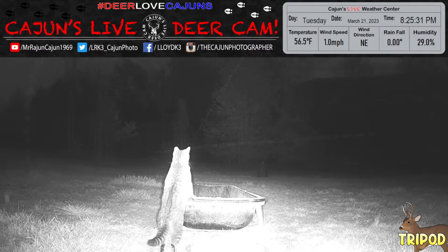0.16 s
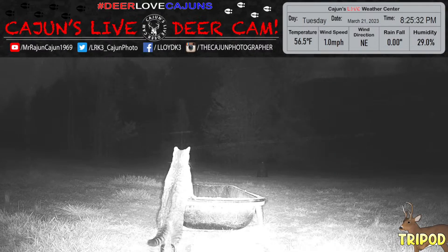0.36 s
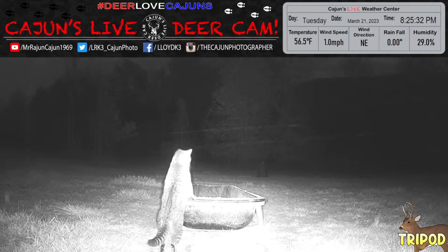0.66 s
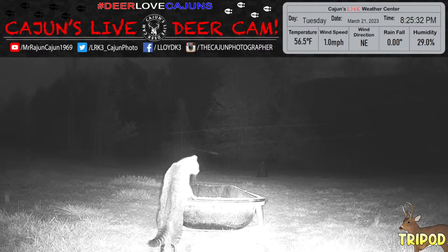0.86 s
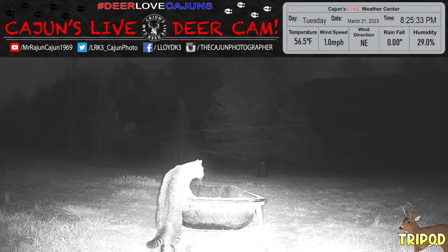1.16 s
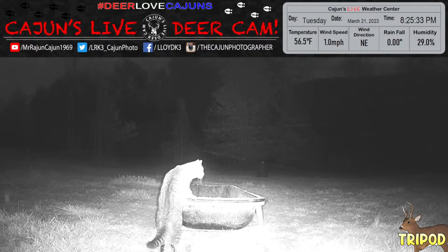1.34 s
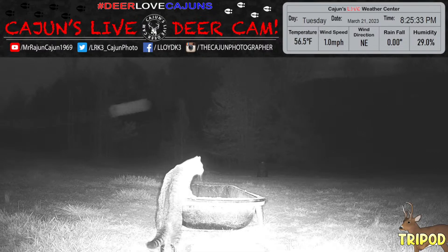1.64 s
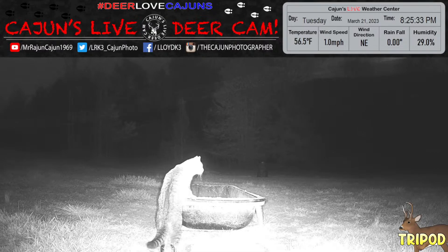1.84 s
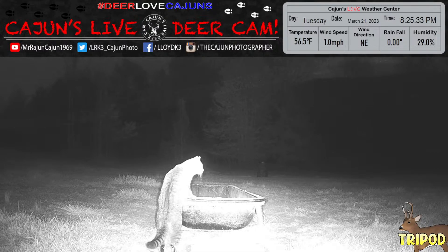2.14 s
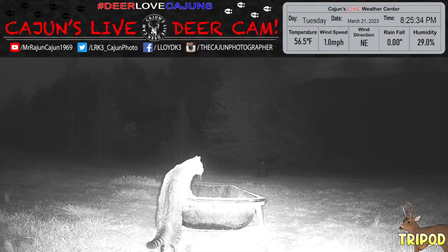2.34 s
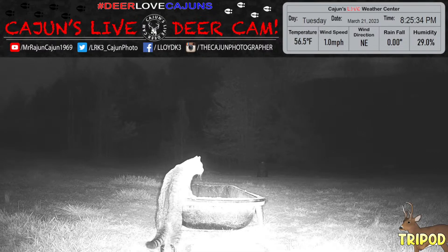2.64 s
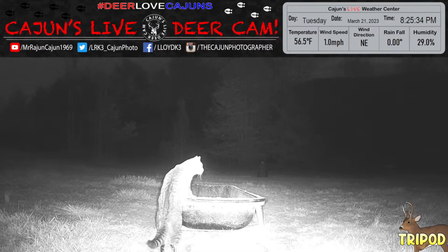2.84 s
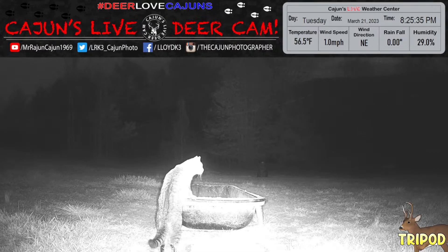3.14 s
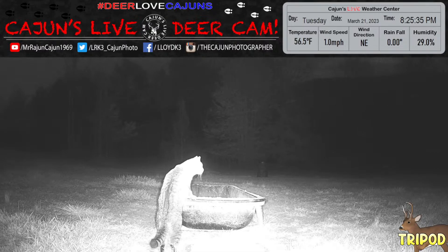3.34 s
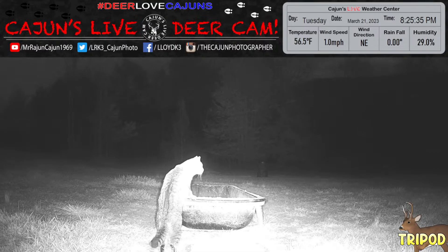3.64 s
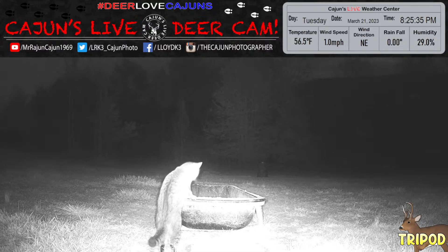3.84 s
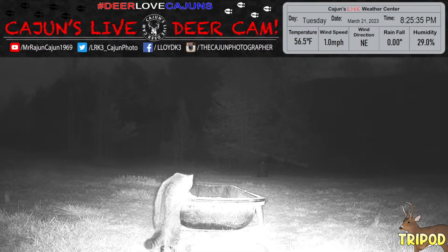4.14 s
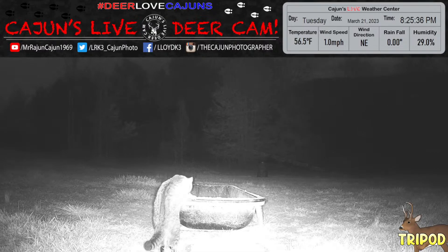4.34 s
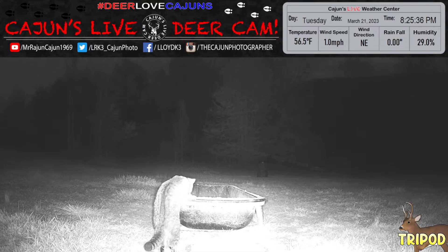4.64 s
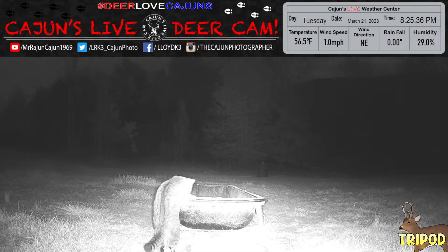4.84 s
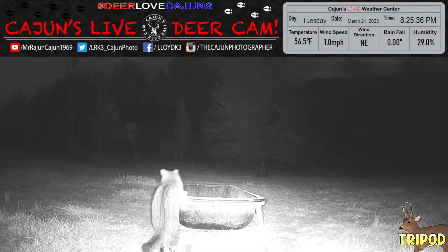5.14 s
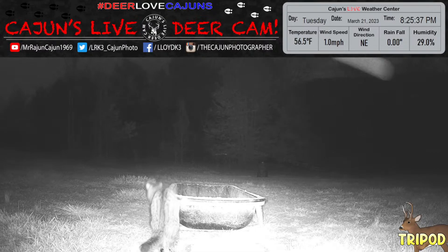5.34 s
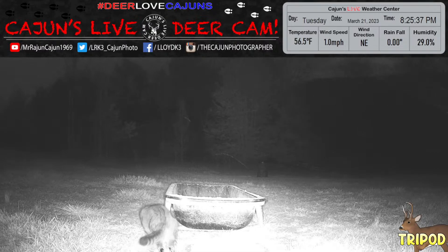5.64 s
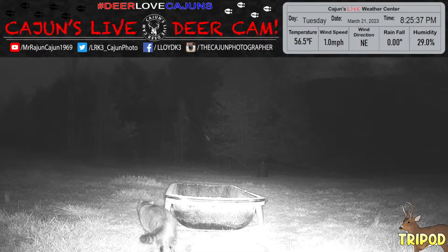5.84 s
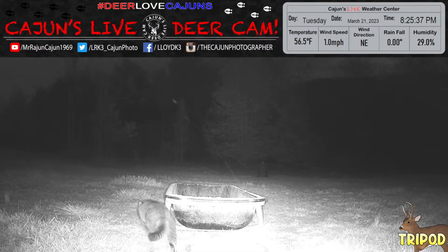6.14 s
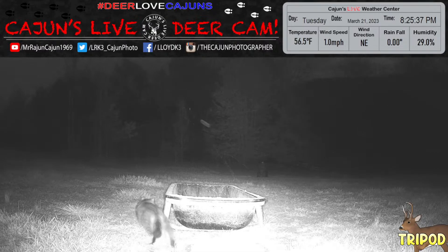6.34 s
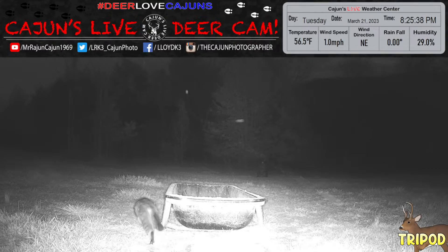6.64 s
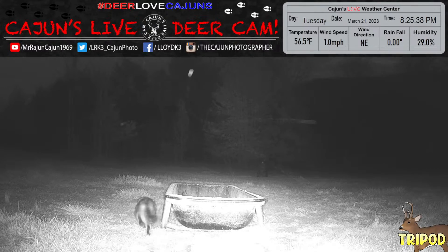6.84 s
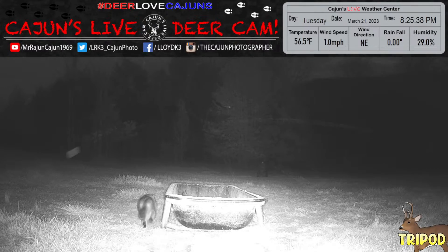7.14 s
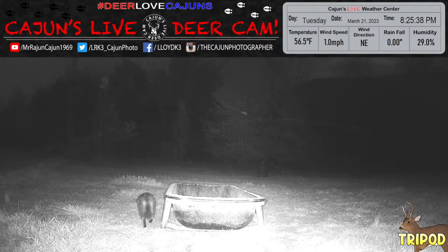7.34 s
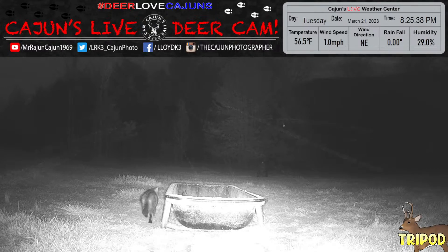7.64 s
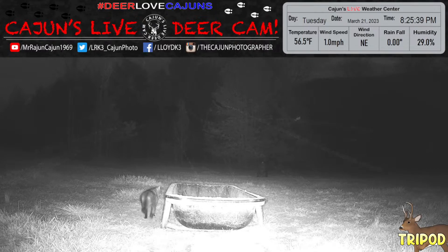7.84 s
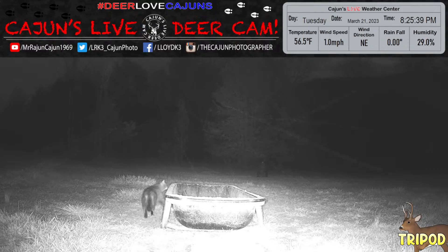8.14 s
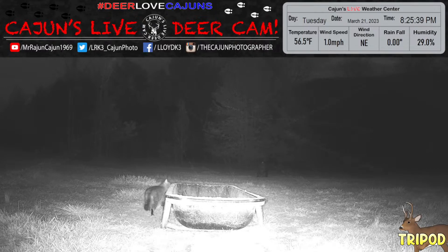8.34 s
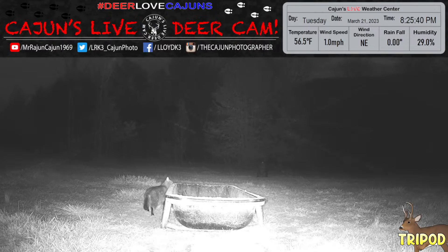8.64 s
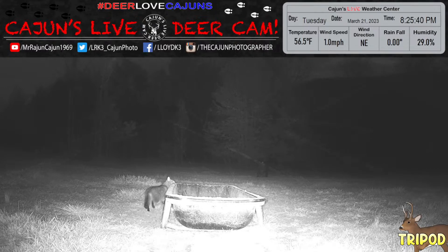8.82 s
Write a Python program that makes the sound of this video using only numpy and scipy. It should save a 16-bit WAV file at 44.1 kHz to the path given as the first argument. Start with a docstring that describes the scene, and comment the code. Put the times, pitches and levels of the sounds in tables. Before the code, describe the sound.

A dense chorus of high, rising frog peeps fills an open field at night, echoing slightly off the trees. One cricket pulses in a fast trill over fainter ones, and far-off traffic makes a low, steady hum. Midway there is a quick, light knocking of paws on a trough, followed by a small snap. Faint microphone hiss lies under everything.

```python
"""Tree frogs whistle rising peeps from their vocal sacs in a night meadow: near ones clear, a far crowd
blurred by the wood. One cricket trills with its wings over fainter ones. Behind them a distant engine
drones over tyre roar. A cat's paws ring a trough, small things snap, and the microphone hisses."""
import sys
import numpy as np
from scipy import signal
from scipy.fft import rfft, irfft
from scipy.io import wavfile
from scipy.ndimage import map_coordinates

SR = 44100
rng = np.random.default_rng(int(sys.argv[2]) if len(sys.argv) > 2 else 0)


def store_pcm(level_fs):
    """Save levels as 16-bit WAV."""
    pcm = np.round(np.clip(level_fs, -1, 1) * 32767).astype(np.int16)
    wavfile.write(sys.argv[1], SR, np.atleast_2d(pcm).T)


N = 396018


def amp(db):
    """Gain of a level in dB."""
    return 10 ** (np.asarray(db) / 20)


def unit(x):
    """Scaled to rms 1."""
    return x / np.sqrt(np.mean(x ** 2) + 1e-20)


def wobble(rate_hz):
    """Smooth random curve, rate_hz knots a second."""
    knots = rng.standard_normal(int(N * rate_hz / SR) + 4)
    return map_coordinates(knots, [np.arange(N) * rate_hz / SR])


def noise(spectrum):
    """Noise of rms 1, coloured by (frequency [Hz], level [dB]) points."""
    hz, db = np.transpose(spectrum)
    grid_hz = np.fft.rfftfreq(N, 1 / SR)
    gain = amp(np.interp(np.log(grid_hz + 1), np.log(hz + 1), db))
    return unit(irfft(rfft(rng.standard_normal(N)) * gain, N))


def add(track, time_s, sound):
    """Mixes a sound into a track."""
    part = track[max(round(time_s * SR), 0):][:len(sound)]
    part += sound[:len(part)]


def glide(length_s, start_hz, end_hz, bend, attack_s, release_s):
    """Progress (0-1), frequency, phase and envelope of a note whose pitch moves fastest at first."""
    t = np.arange(round(length_s * SR)) / SR
    progress = t / length_s
    hz = start_hz + (end_hz - start_hz) * (progress + bend * progress * (1 - progress))
    phase = 2 * np.pi * (np.cumsum(hz) / SR + rng.random())
    edge = np.clip(np.minimum(t / attack_s, (length_s - t) / release_s), 0, 1)
    return progress, hz, phase, np.sin(np.pi / 2 * edge) ** 2


def wood_echo(x, t60_s, gap_s):
    """Trees scatter the sound into a decaying tail after a gap."""
    t = np.arange(SR) / SR
    tail = rng.standard_normal(SR) * amp(-60 * t / t60_s) * (t > gap_s)
    return signal.fftconvolve(x, tail / np.linalg.norm(tail))[:N]


# Tyre roar level: (time [s], relative level [dB])
ROAD_LEVEL = [(0, -45), (3.6, -44.5), (6.2, -44.5), (6.75, -44.5), (8.05, -44), (8.98, -44.5)]
# Tyre roar spectrum: (frequency [Hz], relative density [dB])
ROAD_SPECTRUM = [(12, -27), (25, -13.5), (38, -24), (70, -4), (135, -4.5), (170, -10.5), (240, -14),
                 (420, -17.5), (540, -22), (700, -28.5), (900, -28.5), (1250, -34), (1650, -41),
                 (2300, -42), (3000, -33.5), (5000, -120)]


def road():
    """Tyres make a dull, nearly steady roar."""
    level_db = np.interp(np.arange(N) / SR, *np.transpose(ROAD_LEVEL)) - 3 + 0.2 * wobble(3.045)
    return amp(level_db) * noise(ROAD_SPECTRUM)


# Engine run: (time [s], cycle rate [Hz], drone [dB], buzz [dB], whine [dB])
ENGINE_RUN = [(0, 19.8, -38.5, -53.5, -54.5), (0.349, 19.5, -44.5, -51, -54), (.8, 18.9, -43.5, -50, -60),
              (1.15, 18, -51, -50, -57.5), (1.4, 17.4, -50, -46.5, -54.5), (2.278, 17, -44.5, -48, -52),
              (2.9, 16.9, -45, -47.5, -55), (3.2, 16.2, -45, -54, -60), (3.7, 16.2, -54.5, -58, -61.5),
              (3.9, 17.4, -65, -50.5, -73), (4.4, 17.2, -58, -55, -65), (5.3, 16.8, -59.5, -57.5, -66),
              (5.6, 17.2, -51, -59.5, -68.5), (6.15, 16.9, -49.5, -66, -83), (6.45, 17.1, -57, -60, -64),
              (6.85, 17.2, -47, -58, -72), (7.6, 16.9, -50.5, -66, -70), (8.05, 16.8, -58.5, -63, -77),
              (8.3, 17.1, -45.5, -66, -80), (8.98, 17.2, -47, -54.5, -82)]
# Low, middle and top harmonics: (cycle multiple, relative level [dB])
DRONE_HARMONICS = [(5, -7), (6, -14), (7, -11), (8, 0)]
BUZZ_HARMONICS = [(9, -2), (10, -7), (11, -1), (12, -1), (13, -13)]
WHINE_HARMONICS = [(15, -5), (16, 0), (17, -3), (19, -11)]


def engine():
    """Harmonics of the engine cycle drift together in pitch and flutter one by one in the air."""
    out, t = np.zeros(N), np.arange(N) / SR
    times_s, cycle_hz, *bands_db = np.transpose(ENGINE_RUN)
    phase = 2 * np.pi * np.cumsum(np.interp(t, times_s, cycle_hz)) / SR
    for harmonics, band_db in zip((DRONE_HARMONICS, BUZZ_HARMONICS, WHINE_HARMONICS), bands_db):
        for k, db in harmonics:
            flutter_db = 1.5 * wobble(2) + 3 * wobble(11)
            gain = amp(np.interp(t, times_s, band_db) + db + 3 + flutter_db)
            out += gain * np.sin(k * phase + 2 * np.pi * rng.random() + 0.75 * wobble(10))
    return out


# Paws leaving the rim: (time [s], level [dB])
PAW_KNOCKS = [(4.972, -35), (5.002, -39), (5.038, -48)]
# Trough modes: (frequency [Hz], relative level [dB], t60 [s])
TROUGH_MODES = [(493, -6, 0.04), (774, -11, 0.027), (1880, -2.5, 0.027), (2220, 6.5, 0.013),
                (3500, -6, 0.016), (4550, -7, 0.01), (5350, -7, 0.01), (5900, -11, 0.011)]


def trough_knocks():
    """A cat's paws ring the trough's modes, in a different balance each knock."""
    out, t = np.zeros(N), np.arange(SR // 20) / SR
    attack = 1 - np.exp(-t / 0.00051)
    for time_s, db in PAW_KNOCKS:
        ring = sum(amp(mode_db + rng.normal(0, 2) - 60 * t / t60_s) * np.sin(2 * np.pi * hz * t)
                   for hz, mode_db, t60_s in TROUGH_MODES)
        add(out, time_s, amp(db) * attack * ring)
    return out


# Snaps in the grass and at the trough: (time [s], relative level [dB], low edge [Hz], high edge [Hz])
SNAP_BURSTS = [(1.0354, -50, 1910, 3300), (1.0356, -58, 4300, 5300), (1.0586, -46, 4150, 5160),
               (1.059, -49.5, 1900, 3000), (4.2545, -51, 1620, 2620), (4.2558, -60, 3800, 6500),
               (5.083, -53, 3495, 5470), (5.512, -41, 2940, 4950), (5.5122, -42, 6040, 9100),
               (7.6227, -53, 4200, 5800)]


def snaps(t60_s=0.013):
    """Each small snap is a few ms of band-limited noise."""
    out, t = np.zeros(N), np.arange(SR // 20) / SR
    envelope = amp(-60 * t / t60_s) * (1 - np.exp(-t / 0.00055))
    for time_s, db, low_hz, high_hz in SNAP_BURSTS:
        band = signal.butter(3, [low_hz, high_hz], "band", fs=SR, output="sos")
        burst = signal.sosfilt(band, rng.standard_normal(len(t)) * envelope)
        add(out, time_s, amp(db - 15.5) * unit(burst))
    return out


def wing_strokes(times_s, levels_db, start_hz, end_hz, spread_hz):
    """Each stroke rings a note that falls as the scraper slows; harder strokes start higher."""
    wing_hz, width_hz, resonance_db = 3830, 150, 4
    out, mean_db = np.zeros(N), np.mean(levels_db)
    for time_s, db, shift in zip(times_s, levels_db, rng.standard_normal(len(times_s))):
        top_hz = start_hz + spread_hz * shift + 25 * (db - mean_db)
        progress, hz, phase, envelope = glide(0.01555, top_hz, end_hz,
                                              bend=0.2, attack_s=0.0022, release_s=0.006)
        ring_db = resonance_db * (np.exp(-((hz - wing_hz) / width_hz) ** 2) - 0.5)
        add(out, time_s - 0.0015, amp(db + ring_db - 6.3 * progress) * envelope * np.sin(phase))
    return out


def far_crickets(strokes=900):
    """Distant wing strokes at random times merge into a grainy band."""
    when, level = rng.random((strokes, 2)).T
    return wing_strokes(when * N / SR, -68 + 8 * level, start_hz=4265, end_hz=3967, spread_hz=198)


# Two trills, one list each: (time [s], strokes so far)
TRILL_STROKES = [
    [(.1813, 0), (.4677, 6), (.7615, 12), (1.177, 20), (1.6919, 30), (2.2122, 40), (2.745, 50),
     (3.0139, 55), (3.2703, 60), (4.1124, 76), (4.2346, 78), (4.3453, 80), (4.4546, 82), (4.8781, 90),
     (5.4054, 100), (5.9442, 110), (6.5838, 122), (6.9165, 128)],
    [(7.4883, 0), (7.7826, 6), (7.9842, 10), (8.3433, 17), (8.6591, 23), (8.9295, 28)],
]
# Stroke strength: (time [s], level [dB])
STROKE_LEVEL = [(.18, -51.5), (1.2, -53), (2.2, -50), (3.6, -49.5), (4.2, -52), (5.4, -50), (6.9, -53.5),
                (7.5, -52), (8.9, -52)]


def near_cricket(jitter_s=0.0012, scatter_db=1.5):
    """Two trills of slightly uneven wing strokes, each starting fast and settling."""
    trills_s = []
    for trill in TRILL_STROKES:
        knots_s, counts = np.transpose(trill)
        trills_s.append(np.interp(np.arange(counts[-1] + 1), counts, knots_s))
    times_s = np.concatenate(trills_s)
    late, hard = rng.standard_normal((len(times_s), 2)).T
    levels_db = np.interp(times_s, *np.transpose(STROKE_LEVEL)) + scatter_db * hard
    return wing_strokes(times_s + jitter_s * late, levels_db, start_hz=4075, end_hz=3632, spread_hz=40)


# Swell of a peep: (progress [0-1], relative level [dB])
SWELL_SHAPE = [(0, -4.5), (.17, -1), (.5, -0.5), (.83, -3), (1, -8.5)]
# Vocal sac radiation, weak on low notes: (frequency [Hz], gain [dB])
SAC_RESPONSE = [(2400, -9), (2550, 0), (2650, 0), (2900, 0), (3150, 1)]
# Overtones of a -40 dB peep: (pitch multiple, relative level [dB])
PEEP_OVERTONES = [(2, -33.5), (3, -35), (4, -40)]


def peeps(rows, waver_db=1.2):
    """The vocal sac radiates rising, nearly pure whistles that swell in and flutter in strength."""
    fundamental, overtones = np.zeros(N), np.zeros(N)
    knots, swell_db = np.transpose(SWELL_SHAPE)
    wavers = rng.standard_normal((len(rows), len(knots)))
    for (time_s, length_s, start_hz, end_hz, level_db), waver in zip(rows, wavers):
        progress, hz, phase, envelope = glide(length_s, start_hz, end_hz,
                                              bend=1 / 3, attack_s=0.015, release_s=0.02)
        shape_db = np.interp(progress, knots, swell_db + waver_db * waver)
        sac_db = np.interp(hz, *np.transpose(SAC_RESPONSE))
        envelope *= amp(level_db + shape_db + sac_db + 4.5)
        onset_s = time_s - 0.005  # soft lead-in
        add(fundamental, onset_s, envelope * np.sin(phase))
        air_gain = amp((level_db + 40) / 4)  # fainter frogs are farther: air absorbs their treble
        treble = sum(amp(db) * np.sin(k * phase) for k, db in PEEP_OVERTONES)
        add(overtones, onset_s, air_gain * envelope * treble)
    # Short waves scatter more in moving air.
    return fundamental * amp(2.3 * wobble(60)) + overtones * (0.6 + 0.8 * wobble(220))


def far_frogs(count=310):
    """A crowd peeps at random times, pitches and distances, blurred by the trees."""
    when, size, pitch, rise, level = rng.random((count, 5)).T
    start_hz = 2470 + 300 * pitch ** 1.3
    length_s = 0.094 + 0.055 * size
    end_hz = start_hz + (1700 + 700 * rise) * length_s
    crowd = peeps(np.transpose([when * N / SR, length_s, start_hz, end_hz, -66.5 + 9 * level]))
    return crowd + amp(-4.5) * wood_echo(crowd, t60_s=1.0, gap_s=0.0031)


# Near frog calls: (time [s], length [s], start pitch [Hz], end pitch [Hz], relative level [dB])
NEAR_PEEPS = [(.015, .088, 2600, 2960, -50), (.02, 0.14, 2430, 2785, -47), (.175, 0.18, 2700, 2980, -52.5),
              (.195, 0.14, 2390, 2690, -48), (.264, 0.082, 2960, 3100, -59), (.359, 0.15, 2580, 2690, -58),
              (.399, .11, 2517, 2717, -42), (.399, 0.19, 2615, 2944, -48), (.464, 0.12, 2530, 2700, -52.5),
              (.683, 0.17, 2860, 3070, -60), (.69, 0.062, 2520, 2600, -54), (.728, 0.19, 2587, 2886, -44),
              (.813, 0.2, 2508, 2810, -43.5), (.853, 0.067, 2510, 2660, -46),
              (.988, 0.11, 2625, 2863, -52.5), (1.132, 0.13, 2414, 2730, -41.5),
              (1.182, 0.13, 2600, 2880, -48.5), (1.212, 0.082, 2900, 3150, -58),
              (1.282, 0.1, 2840, 2896, -53.5), (1.327, 0.13, 2516, 2766, -42),
              (1.347, 0.12, 2720, 2980, -55), (1.472, 0.2, 2664, 3020, -51),
              (1.532, 0.058, 2730, 2840, -47), (1.631, 0.11, 2550, 2854, -40.5),
              (1.781, .13, 2665, 2803, -45), (1.946, 0.14, 2500, 2714, -44), (2.085, 0.17, 2466, 2757, -41),
              (2.1, 0.22, 2610, 2930, -44.5), (2.115, 0.09, 2470, 2594, -45),
              (2.325, 0.12, 2870, 3150, -58.5), (2.375, 0.22, 2580, 2880, -54.5),
              (2.454, .15, 2510, 2833, -43.5), (2.504, .074, 2540, 2630, -50.5),
              (2.629, 0.16, 2800, 2960, -52), (2.674, 0.081, 2690, 2920, -54),
              (2.759, 0.11, 2700, 2940, -55.5), (2.829, 0.14, 2630, 2786, -47),
              (2.948, 0.21, 2675, 2914, -47.5), (2.978, 0.21, 2437, 2730, -42.5),
              (3.123, 0.21, 2472, 3005, -48), (3.168, 0.068, 2560, 2650, -44.5),
              (3.198, .15, 2460, 2776, -45), (3.213, 0.12, 2860, 3170, -57), (3.403, .2, 2570, 2916, -48.5),
              (3.432, 0.079, 2530, 2710, -45.5), (3.602, 0.2, 2630, 3030, -51.5),
              (3.682, 0.16, 2530, 2820, -44), (3.821, 0.14, 2644, 2797, -44.5),
              (3.966, .17, 2616, 2864, -44), (4.016, 0.11, 2500, 2750, -40.5),
              (4.18, 0.19, 2595, 3020, -48.5), (4.295, .14, 2460, 2773, -45.5), (4.3, 0.1, 2580, 2780, -56),
              (4.33, 0.12, 2820, 3140, -53), (4.495, 0.098, 2558, 2820, -54),
              (4.495, 0.15, 2697, 3042, -55), (4.654, 0.18, 2490, 2843, -43),
              (4.694, 0.26, 2526, 2826, -44.5), (4.819, .11, 2615, 2802, -48),
              (4.849, 0.23, 2585, 2923, -45.5), (4.999, 0.15, 2618, 2900, -43.5),
              (5.024, 0.17, 2452, 2744, -39), (5.238, 0.088, 2500, 2610, -56),
              (5.288, 0.18, 2570, 2990, -47), (5.318, 0.12, 2550, 2875, -50),
              (5.383, 0.096, 2590, 2830, -51.5), (5.418, 0.17, 2770, 2950, -53.5),
              (5.542, 0.097, 2690, 2910, -60), (5.662, 0.045, 2538, 2850, -51),
              (5.677, 0.092, 2940, 3130, -56), (5.677, .16, 2425, 2810, -43.5),
              (5.832, .15, 2475, 2817, -36.5), (5.882, 0.035, 2730, 2870, -50),
              (5.892, 0.15, 2520, 2775, -40), (6.016, 0.16, 2553, 2860, -43.5),
              (6.041, 0.18, 2427, 2690, -46), (6.301, 0.24, 2558, 2974, -45),
              (6.331, 0.081, 2460, 2600, -54), (6.475, .14, 2670, 2950, -53.5), (6.49, .1, 2540, 2800, -54),
              (6.66, 0.1, 2860, 3180, -54), (6.685, 0.11, 2710, 2960, -50),
              (6.785, 0.18, 2503, 2814, -37.5), (6.969, 0.15, 2474, 2830, -37.5),
              (7.0, 0.094, 2750, 2850, -47), (7.149, .13, 2370, 2730, -46), (7.204, 0.13, 2720, 2870, -52),
              (7.288, 0.15, 2443, 2735, -42), (7.463, 0.12, 2680, 2860, -47.5),
              (7.488, 0.23, 2580, 2926, -46.5), (7.613, 0.066, 2590, 2800, -49),
              (7.693, 0.15, 2520, 2910, -49), (7.702, 0.069, 2930, 3130, -49),
              (7.732, 0.13, 2504, 2780, -39.5), (7.892, 0.19, 2471, 2845, -41.5),
              (7.92, 0.035, 2665, 2690, -42), (7.957, 0.091, 2820, 3020, -56),
              (7.962, 0.088, 2670, 2660, -47), (8.087, 0.16, 2594, 2970, -53),
              (8.201, 0.063, 2464, 2650, -49), (8.222, 0.17, 2440, 2827, -38.5),
              (8.471, .1, 2650, 2848, -53.5), (8.595, 0.052, 2685, 2840, -54.5),
              (8.63, 0.14, 2524, 2800, -46), (8.68, 0.12, 2470, 2710, -41.5),
              (8.735, .059, 2830, 2950, -51), (8.83, .18, 2577, 2844, -41.5),
              (8.85, 0.11, 2860, 3140, -50.5), (8.85, .13, 2527, 2723, -41.5),
              (8.855, .07, 2460, 2640, -45), (8.9, 0.052, 2820, 2970, -54)]


def near_frogs():
    """Close frogs whistle clear, overlapping peeps."""
    return peeps(NEAR_PEEPS)


def scene():
    """Callers, knocks and snaps echo in the wood over distant traffic; mono."""
    frogs, cricket = near_frogs(), near_cricket()
    echo = amp(-17) * wood_echo(frogs, t60_s=0.36, gap_s=0.0089)
    echo += amp(-4.5) * wood_echo(cricket, t60_s=0.66, gap_s=0.019)
    ticks = trough_knocks() + snaps()
    echo += amp(-6.5) * wood_echo(ticks, t60_s=0.083, gap_s=0.00067)
    background = far_frogs() + far_crickets() + road() + engine()
    return (background + ticks + cricket + frogs + echo)[None]


# Microphone hiss: (frequency [Hz], relative density [dB])
HISS_SPECTRUM = [(1910, -30), (3250, -10.5), (3520, -6.5), (3940, -1.5), (4130, -2), (4780, -9),
                 (5290, -6.5), (6000, -9.5), (8000, -10.5), (10800, -15), (12000, -20.5), (15200, -13),
                 (16000, -16)]


def record(dry):
    """The microphone adds hiss and limits the band; the converter adds a standing offset."""
    top_hz, dc_offset = 15750, -0.0025
    hiss = amp(-63.5 + 0.75 * wobble(13)) * noise(HISS_SPECTRUM)
    passband = np.fft.rfftfreq(N, 1 / SR) < top_hz
    return irfft(rfft(dry + hiss) * passband, N) + dc_offset


dry = scene()
out = record(dry)
store_pcm(out)
```